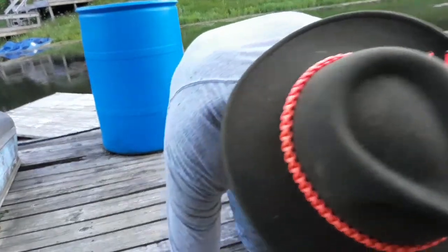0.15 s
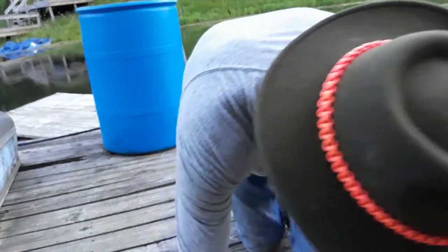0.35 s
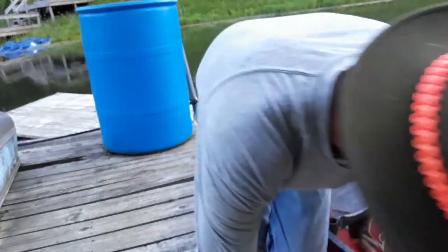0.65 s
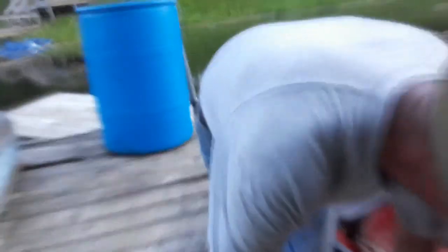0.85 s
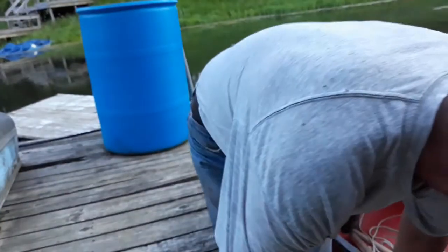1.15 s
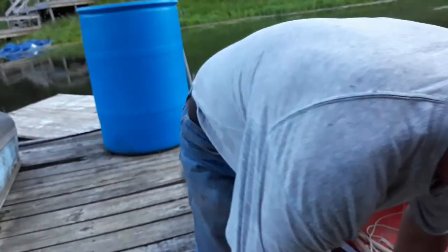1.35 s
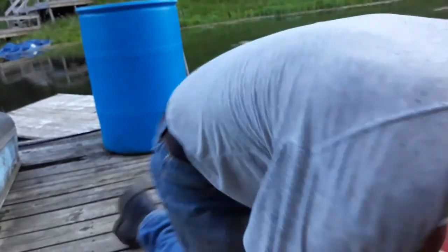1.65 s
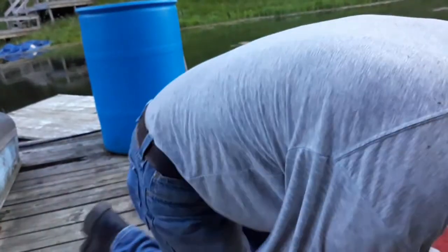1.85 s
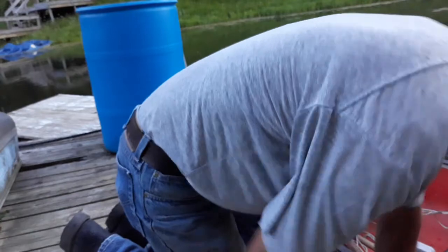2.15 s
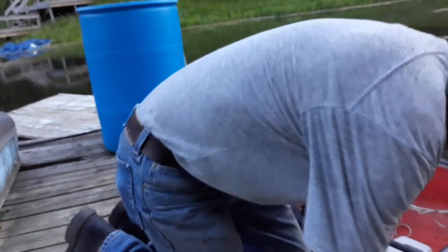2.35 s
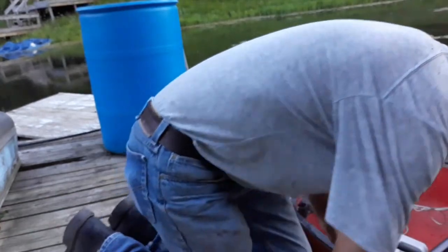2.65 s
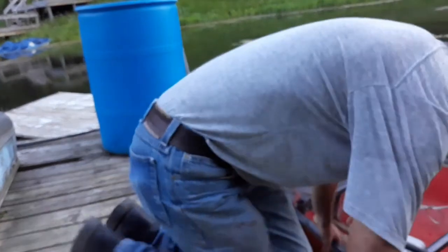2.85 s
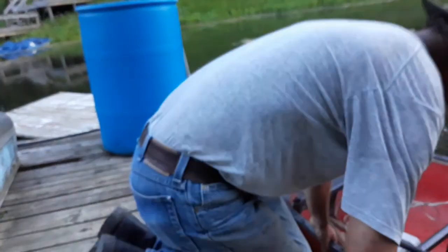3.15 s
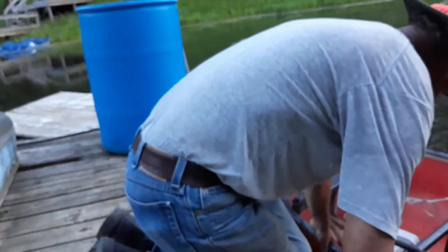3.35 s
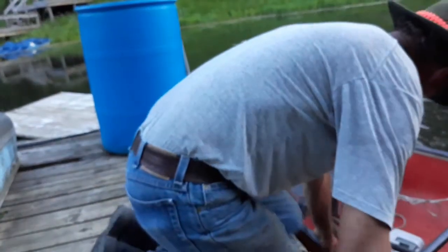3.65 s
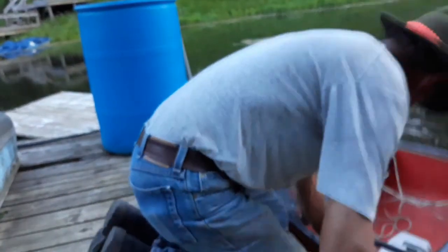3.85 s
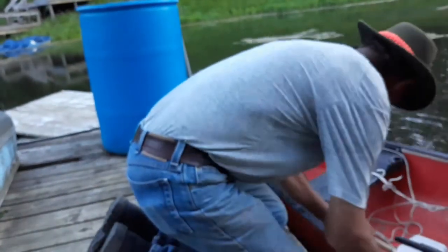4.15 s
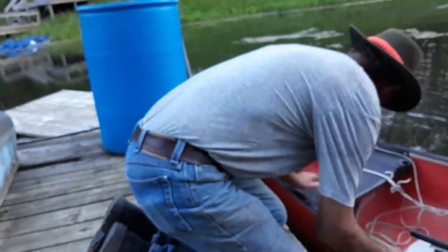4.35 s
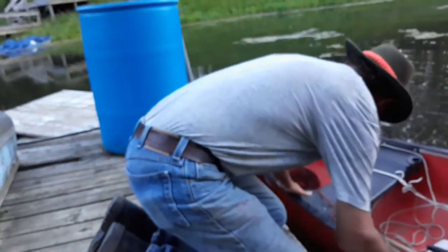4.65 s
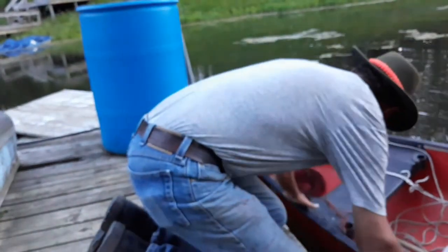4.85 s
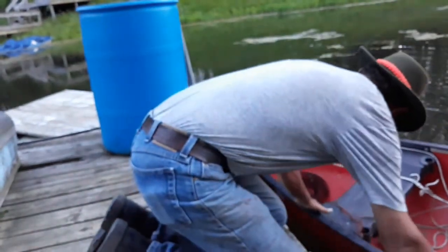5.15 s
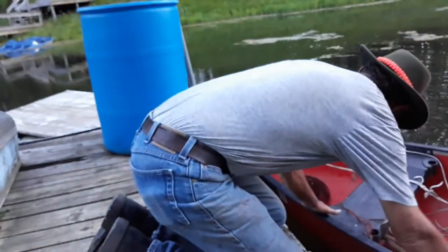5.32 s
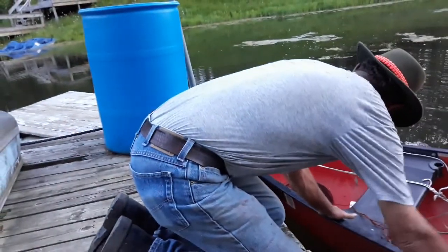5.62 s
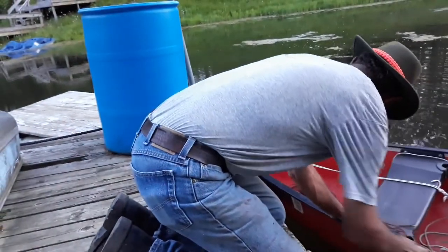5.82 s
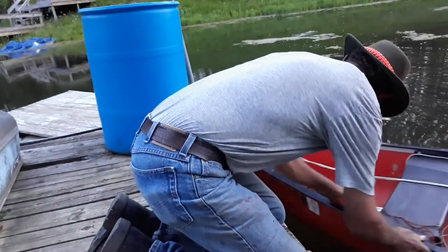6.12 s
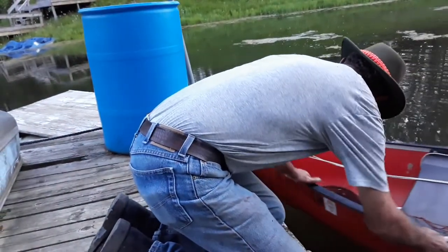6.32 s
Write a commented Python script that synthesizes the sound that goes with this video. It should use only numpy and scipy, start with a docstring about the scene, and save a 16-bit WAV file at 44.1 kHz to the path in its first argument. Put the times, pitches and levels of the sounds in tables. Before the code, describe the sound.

Frogs call beside a lake in high, insect-like clicking trills, a few close to the microphone and slightly right, many more along the shore. Nearby, a canoe is handled at a wooden dock, giving clusters of hollow knocks, low rubs and brief rustles of gear. The handling dies away after about four and a half seconds, and the chorus carries on, a little softer, over faint open-air noise.

```python
"""Lakeside frog chorus and a canoe

Insect-like clicking calls, most likely cricket frogs, come from a few animals close by and many along
the shore. Each call is a pulse train that excites a vocal sac resonant near 3.5 kHz; lower chirps cross
from the far bank. A canoe is handled at a plank dock: impacts ring the modes of hull and wood, stick-slip
friction rubs and groans, and gear rustles. Faint open-air noise and a distant hum lie underneath."""
import sys
import numpy as np
from scipy import signal
from scipy.fft import rfft, irfft
from scipy.io import wavfile
from scipy.ndimage import uniform_filter1d

SR = 44100
rng = np.random.default_rng(int(sys.argv[2]) if len(sys.argv) > 2 else 0)


def generate_wav(signal):
    """Clip the signal to [-1, 1] and save it as 16-bit WAV at the path in sys.argv[1]."""
    frames = np.transpose(np.atleast_2d(signal))
    scaled = np.clip(frames, -1, 1) * 32767
    pcm = np.round(scaled).astype(np.int16)
    wavfile.write(sys.argv[1], SR, pcm)


N = 285768

BINS = np.fft.rfftfreq(4096, 1 / SR)
PORT_DELAY_S = .000475  # lag at the left microphone port for the close frogs
# Spectral envelope of a close pulse, apart from the sac resonance: f/Hz, level/dB
PULSE_SPECTRUM = [(900, -39.5), (1700, -24.5), (2550, -24.5), (2900, -5.5), (3120, -9.5), (3620, 2),
                  (4120, -4.5), (4400, -12.5), (4690, -14.5), (5350, -5.5), (5850, -11), (6350, -18),
                  (6950, -8), (7600, -10.5), (8800, -37), (13300, -21), (16000, -45.5)]
# Close frogs by name: sac f/Hz, bandwidth/Hz, overtones/dB, rasp/dB, extra echo/dB, left-right/dB
FROGS = {"lead": (3507, 376, -1, -4.5, 7.5, -3.5), "second": (3407.5, 380.5, 2, 0, 2.5, -3.5),
         "bright": (3728, 422, 7, 16, 10.5, -10), "husky": (3606, 329, -7.5, 12, 10, -4),
         "faint": (3543, 299, -2, 3.5, 3, -2.5), "low": (3220, 148, -4.5, 1, -4, 1)}


def sac_pulse(spectrum, hz, overtones_db, rasp_db, width_hz, reference_hz=3626):
    """Resonance: a click rings the vocal sac; a smaller animal shifts the nearby spectrum upward."""
    sac_db = -10 * np.log10(1 + (2 * (BINS - hz) / width_hz) ** 2)
    above = np.interp(BINS, [3600, 4800, 7500, 9000], [0, 1, 1, 0])
    below = np.interp(BINS, [900, 1500, 2600, 3100, 3500], [0, .75, 1.25, .35, 0])
    shift_hz = (hz - reference_hz) * np.exp(-abs(BINS - hz) / 2500)
    envelope_db = lookup(spectrum, np.maximum(BINS - shift_hz, 0))
    ring = minimum_phase(envelope_db + sac_db + overtones_db * above + rasp_db * below)[:700]
    return ring / abs(ring).max()


def trill(frog, pulses, first_gap, last_gap, fade_db, glide=.01):
    """Pulse-train excitation: spacing and level drift, pitch rises a little, and each pulse varies."""
    hz, width_hz, overtones_db, rasp_db, *_ = FROGS[frog]
    out = np.zeros(4096)
    gaps = first_gap + (last_gap - first_gap) * np.linspace(0, 1, pulses - 1) ** 1.5
    starts = np.r_[0, np.cumsum(gaps)]
    for k, (loud_db, detune, tilt_db) in enumerate(rng.standard_normal((pulses, 3)) * [.5, .008, 1.2]):
        pitch = hz * (1 + glide * (k - (pulses - 1) / 2) + detune)
        ring = sac_pulse(PULSE_SPECTRUM, pitch, overtones_db + tilt_db, rasp_db - tilt_db, width_hz)
        add(out, starts[k], gain(loud_db - fade_db * (k / (pulses - 1)) ** 1.35) * ring)
    return out


def near_calls(turn_db_per_s=.22):
    """Impulse excitation, in trains or singly: yields t/s, level/dB, echo/dB, left-right/dB, sound."""
    # Trills: t/s, level/dB, pulses, first gap/s, last gap/s, fade/dB, frog
    trills = [(0.1018, -12.5, 5, .006, 0.0076, 3, "second"), (0.2103, -5.5, 4, 0.0042, 0.0034, 5, "lead"),
              (0.3589, -12.5, 5, 0.0069, 0.0038, 0.5, "second"),
              (0.4576, -5.5, 5, .0054, 0.0033, 5.5, "lead"), (.586, -16.5, 6, .006, 0.0064, -1.5, "second"),
              (0.7085, -7, 4, .0053, .0047, 3.5, "lead"), (0.8193, -15.5, 5, 0.0051, 0.0061, 8, "second"),
              (0.9403, -5.5, 5, 0.0048, 0.0039, 9.5, "lead"),
              (1.0439, -12.5, 6, 0.0066, .0055, 6, "second"), (1.1594, -3.5, 5, 0.0046, 0.0046, 9, "lead"),
              (1.292, -15, 6, 0.0053, 0.0047, 0, "second"), (1.4041, -7, 5, .0055, 0.0024, 6, "lead"),
              (1.525, -30, 4, 0.0055, 0.0032, -8.5, "second"), (1.5507, -3.5, 4, 0.006, 0.0041, 13, "lead"),
              (1.676, -6.5, 4, .0057, 0.0037, 12.5, "lead"), (1.7987, -5.5, 3, .0058, 0.0059, 6.5, "lead"),
              (1.9229, -7, 4, 0.0067, 0.0043, 7, "lead"), (2.0509, -6, 5, 0.0066, .0046, 9, "lead"),
              (2.1864, -7, 4, .0061, 0.0044, 4.5, "lead"), (2.3365, -5, 4, .0061, 0.0067, 8, "lead"),
              (2.4991, -8, 3, .0057, 0.0035, 3, "lead"), (2.615, -13.5, 6, 0.0068, 0.0049, 1, "second"),
              (2.6944, -6.5, 5, .0056, 0.0047, 8.5, "lead"), (2.8741, -7, 5, .0057, 0.0042, 11, "lead"),
              (3.0138, -9.5, 4, 0.0053, 0.0036, 3.5, "lead"), (3.1433, -11, 4, .006, 0.0046, 4.5, "lead"),
              (3.2006, -22, 6, .006, 0.0046, 2, "second"), (3.3456, -7, 4, 0.0057, 0.0063, 7, "lead"),
              (3.478, -19.5, 6, 0.0055, .0058, -0.5, "low"), (3.6424, -10, 5, .0062, 0.0062, 6, "lead"),
              (3.762, -29, 6, 0.0047, .005, 10, "low"), (4.075, -32, 7, 0.0066, 0.0052, 2, "low"),
              (5.085, -20, 4, .0058, 0.0066, 4, "low"), (5.295, -25, 4, 0.0089, .0055, 9, "low"),
              (3.9033, -9.5, 5, 0.0062, .0053, 4.5, "lead"), (4.1338, -12, 5, .0064, .0043, 5, "lead"),
              (4.2942, -14.5, 5, .0059, 0.0043, 5, "lead"), (4.385, -27, 7, .006, 0.0072, 1.5, "faint"),
              (4.4328, -17.5, 3, 0.0071, 0.007, 1, "faint"), (4.5198, -8, 5, .0062, 0.0073, 10.5, "lead"),
              (4.735, -28, 5, .006, 0.0066, 1, "faint"), (4.85, -20, 4, .006, 0.007, 13, "faint"),
              (4.9215, -13.5, 4, .0053, 0.0035, 13, "husky"),
              (5.0575, -14, 4, 0.0069, 0.0056, 8.5, "bright"), (5.121, -29, 3, 0.0041, 0.012, 1.5, "faint"),
              (5.461, -17.5, 7, 0.0043, .0055, 2.5, "faint"), (5.6109, -13, 4, 0.0064, 0.0045, 8, "bright"),
              (5.6548, -13.5, 3, 0.0048, 0.0037, 12, "husky"), (5.747, -21, 9, .006, .0055, 3.5, "faint"),
              (5.832, -15.5, 4, 0.0056, 0.0062, 5, "bright"),
              (5.904, -21.5, 7, .006, 0.0062, -0.5, "faint"),
              (6.039, -13.5, 4, .0053, 0.0052, 9.5, "husky"),
              (6.1351, -14, 4, 0.0052, 0.006, 3.5, "bright"), (6.218, -22, 9, .006, 0.0034, 22, "faint"),
              (6.3383, -14, 4, .006, 0.0059, 5, "bright"), (6.4472, -13.5, 3, 0.0063, 0.0046, 1.5, "husky")]
    # Clicks with which the second frog winds up to a trill: time ahead/s, relative level/dB
    wind_up = [(0.045, 0.5), (0.015, -9), (0.017, -1)]
    # Its lone clicks: t/s, level/dB
    lone_clicks = [(.058, -19.5), (.2766, -11.5), (0.3057, -11), (1.1015, -17), (1.1385, -16.5),
                   (2.3235, -12), (2.4672, -9), (3.2898, -11.5), (3.3074, -10.5), (3.5597, -13),
                   (3.589, -9), (3.601, -10.5), (3.8732, -13.5), (4.448, -6.5), (4.4713, -10.5),
                   (4.492, -12)]
    clicks = list(lone_clicks)
    for s, db, pulses, first_gap, last_gap, fade_db, frog in trills:
        *_, wet_db, pan_db = FROGS[frog]
        if frog == "lead":  # it turns and sounds more central
            pan_db += turn_db_per_s * s
        if frog == "second":
            clicks += [(s - ahead, db + relative_db) for ahead, relative_db in wind_up]
        yield s, db, wet_db, pan_db, trill(frog, pulses, first_gap, last_gap, fade_db)
    hz, width_hz, overtones_db, rasp_db, wet_db, pan_db = FROGS["second"]
    for s, db in clicks:
        yield s, db, wet_db, pan_db, sac_pulse(PULSE_SPECTRUM, hz, overtones_db - 2, rasp_db, width_hz)


def near_frogs(level_db=.12, echo_db=-24):
    """Direct-to-reverberant ratio: the farther and fainter a frog on the right, the more of it is echo."""
    direct, scattered = np.zeros((2, 2, N))
    for s, db, wet_db, pan_db, voice in near_calls():
        sound = gain(level_db) * ports(voice, pan_db, PORT_DELAY_S)
        add(direct, s, gain(db) * sound)
        add(scattered, s, gain(echo_db + wet_db) * sound)
    return direct + shore_echo(scattered, t60=.031)


def far_frogs(count=13, calls_per_s=3.9, pitch_hz=3550, width_hz=240, level_db=2.01, echo_db=-7):
    """Incoherent sum of many frogs along the shore, each with its own pitch, rasp, pace and direction."""
    # Pulse spectrum after crossing the water: f/Hz, level/dB
    far_spectrum = [(1000, -32), (1700, -11.5), (2300, -12), (2800, -2.5), (3200, 2.5), (3700, -1),
                    (4400, -12), (5200, -4), (6300, -15), (7200, -4.5), (8800, -27), (13500, -32.5),
                    (16000, -30)]
    # Envelope of the chorus: t/s, level/dB
    chorus_level = [(0, -28.5), (.46, -32.5), (.8, -29), (1.18, -32), (1.82, -29), (2, -31.5), (2.3, -29.5),
                    (2.76, -33.5), (2.9, -29), (3.04, -34), (3.7, -33), (4.29, -32.5), (4.42, -29.5),
                    (4.58, -33), (4.75, -30), (5.27, -30), (5.37, -31.5), (6.48, -30)]
    out, places = np.zeros((2, N)), (np.arange(count) + .5) / count
    for place, build, turn in zip(places, rng.permutation(places), rng.permutation(places)):
        hz = pitch_hz * (1 + .029 * np.arctanh(2 * build - 1))
        pace, gap_s, rasp_db = rng.uniform([.78 * calls_per_s, .0044, -8], [1.2 * calls_per_s, .0072, 1])
        ring, clicks = sac_pulse(far_spectrum, hz, 0, rasp_db, width_hz), np.zeros(N)
        for beat, (late, loud, length, hurry) in enumerate(rng.uniform(-1, 1, (48, 4))):
            k = np.arange(round(9 + 5 * length))
            onset = (beat - 1 + turn + .3 * late) / pace
            # even pulses that slowly speed up or lag give the call a short gliding tone
            s = onset + gap_s * k * (1 + .003 * hurry * k) + .00004 * rng.standard_normal(len(k))
            arch = np.sin(np.pi * (k + 1) / (len(k) + 1)) ** .5
            strength = gain(6.5 * loud + 2.2 * rng.standard_normal(len(k))) * arch
            heard = (s >= 0) & (s < (N - 1) / SR)
            clicks[(s[heard] * SR).astype(int)] += strength[heard]
        delay_s = PORT_DELAY_S * (1 - 1.547 * place ** 2.586)
        out += wandering_ring(clicks, ports(ring, .5, delay_s))
    out += gain(echo_db) * shore_echo(out)
    # the animals fill each other's gaps, so the sum is levelled before it takes its envelope
    running_rms = np.sqrt(uniform_filter1d((out ** 2).mean(0), size=3400) + 1e-12)
    return gain(level_db) * envelope(chorus_level) * out / running_rms


def wandering_ring(clicks, ring, wander_hz=70, steps_per_s=22):
    """Single-sideband shift: the pitch rung by the clicks drifts within and between calls."""
    steps = np.arange(N) / SR * steps_per_s
    phase = phase_of(wander_hz * np.interp(steps, np.arange(512), rng.standard_normal(512)))
    quadrature = convolve(clicks, signal.hilbert(ring).imag)
    return convolve(clicks, ring) * np.cos(phase) - quadrature * np.sin(phase)


def shore_echo(x, t60=.99):
    """Scattering off water, planks and trees: sparse reflections that decay exponentially."""
    t = np.arange(SR // 2) / SR
    tail = rng.standard_normal((2, len(t))) * decay(t, t60) * (t > .0025)
    tail *= rng.random((2, len(t))) < .05
    return convolve(x, tail / np.linalg.norm(tail[0]))


def chirps(level_db=-8, width_hz=130, glide=-.08, rasp=.65, throb=.49, throb_hz=185, size=1200):
    """Amplitude modulation: throbbing, raspy notes that fall in pitch, from the far bank on the left."""
    # Chirps: t/s, level/dB, centre f/Hz
    notes = [(3.376, -24.5, 2740), (3.522, -27, 2750), (4.215, -28, 2610), (5.652, -30, 2610),
             (6.04, -28.5, 2700), (6.45, -28, 2690)]
    out, u = np.zeros((2, N)), np.arange(size) / size
    beats = 1 - throb * np.cos(2 * np.pi * throb_hz * np.arange(size) / SR)
    for s, db, hz in notes:
        a, b = unit_rms(lowpass(rng.standard_normal((2, size)), width_hz, order=2))
        phase = phase_of(hz * (1 + glide * (u - .5)))
        tone = unit_rms((1 + rasp * a) * np.sin(phase) + rasp * b * np.cos(phase))
        note = tone * beats * np.sin(np.pi * u)
        add(out, s, gain(db + level_db) * ports(note, .66, -PORT_DELAY_S / 4))
    return out


def hull_response(ring_db=-8, thud_db=-2, tail_db=-8, thud_t60=.075, size=32768):
    """Modal impulse response of hull and dock: a thud, modes that shift with load, and a hollow tail."""
    # Distinct modes: f/Hz, level/dB, T60/s
    hull_modes = [(99, -1, 0.32), (133.4, -6.5, 0.47), (189.3, -2.5, 0.33), (221.1, 0, 0.37),
                  (283, -2, 0.19), (314, -2.5, 0.14), (393, -7, 0.32), (480.6, -10, 0.076), (554, -14, .11),
                  (669, -10.5, 0.14), (800, -13, .14), (890, -14, .15), (1038, -5.5, .15), (1090, -16, .12),
                  (1130, -12.5, 0.16)]
    # Spectrum of the dense plank modes: f/Hz, level/dB
    plank_spectrum = [(25, -49.5), (55, -7), (100, 4), (200, -2), (300, -2.5), (600, -4), (900, -5),
                      (1400, -4), (3000, -1.5), (8000, -51)]
    # Their decay: f/Hz, T60/s
    plank_t60 = [(80, 0.83), (210, 0.51), (560, 0.31), (1470, 0.037), (8000, 0.064)]
    # Difference between the two ports: f/Hz, side against mid/dB
    stereo_width = [(100, -18.5), (250, -7.5), (500, -7), (1000, -.5)]
    t = np.arange(size) / SR
    load = 1 + .025 * rng.uniform(-1, 1, len(hull_modes))
    modes = sum((-1) ** k * gain(db) * decay(t, t60) * np.sin(2 * np.pi * hz * load[k] * t)
                for k, (hz, db, t60) in enumerate(hull_modes))
    mid, side = coloured(rng.standard_normal((2, size)), plank_spectrum)
    side = coloured(side, stereo_width)
    dense = np.array([mid + side, mid - side])
    band_hz, frame_s, bands = signal.stft(dense[:, ::-1], SR, nperseg=1024)
    bands *= decay(frame_s, lookup(plank_t60, band_hz)[:, None])
    tail = signal.istft(bands, SR, nperseg=1024)[1][:, :size]
    thud = dense * decay(t, thud_t60)
    whole = sum(gain(db) * unit_rms(x) for db, x in [(ring_db, modes), (thud_db, thud), (tail_db, tail)])
    return whole * (1 - np.exp(-t / .00087))


def knocks(spot_db=3, overtone_db=-9, overtone_ratio=2.15, sag=.21, sag_s=.01):
    """Impact of hull on dock: the struck spot swings as a damped oscillator; soft contact cuts treble."""
    # Impacts: t/s, level/dB, spot f/Hz, contact cut-off/Hz, spot T60/s
    impacts = [(0.136, -34, 209, 440, 0.057), (.188, -41, 136, 300, 0.064), (0.636, -50.5, 110, 170, 0.14),
               (.689, -54, 106, 170, .1), (.738, -45, 120, 625, .08), (.775, -46, 116, 400, 0.074),
               (0.838, -32.5, 292, 1180, 0.066), (.848, -28, 139, 600, 0.026),
               (.863, -39.5, 415, 1200, 0.065), (0.889, -31, 135, 219, 0.18), (.946, -27, 123, 475, .045),
               (1.004, -35.5, 106, 290, 0.069), (1.678, -34, 199, 680, 0.054),
               (1.738, -37.5, 95.5, 1100, .06), (1.766, -41, 158, 606, 0.063),
               (1.799, -31.5, 510, 800, 0.033), (1.805, -32, 211, 850, .06),
               (1.819, -29.5, 280, 603, 0.031), (1.842, -33, 235, 644, 0.045),
               (1.872, -34.5, 185, 400, 0.043), (1.929, -43, 205, 260, 0.11),
               (2.021, -35.5, 162, 335, 0.073), (2.108, -23.5, 186, 695, 0.03),
               (2.123, -27, 378, 495, 0.057), (2.18, -42, 410, 457, 0.16), (2.212, -36.5, 166, 310, 0.046),
               (2.354, -48.5, 147, 296, 0.084), (2.822, -54, 115, 220, .08), (2.862, -30.5, 207, 454, .04),
               (2.913, -28.5, 207, 625, 0.031), (3.443, -47.5, 270, 710, 0.035),
               (3.807, -47.5, 443, 1020, 0.03), (3.82, -41.5, 264, 490, 0.037),
               (4.452, -44.5, 506, 850, 0.088), (4.464, -41, 309, 750, 0.093), (4.488, -49, 230, 700, .06),
               (4.587, -62, 800, 1200, 0.033)]
    out, onset = np.zeros((2, N)), 900  # the first samples set a knock's level
    for s, db, spot_hz, bright_hz, spot_t60 in impacts:
        # a stiff, high-pitched spot stirs little of the deep hull ring
        body = butterworth(lowpass(hull_response(), bright_hz), spot_hz / 2.18, "high", order=2)
        t = np.arange(body.shape[1]) / SR
        # the spot starts stiff and relaxes, so its pitch sags; a hard blow adds an overtone
        phase = phase_of(spot_hz * (1 + sag * (np.exp(-t / sag_s) - .5)))
        overtone_gain = gain(overtone_db) / (1 + (overtone_ratio * spot_hz / bright_hz) ** 2)
        swing = np.sin(phase) + overtone_gain * np.sin(overtone_ratio * phase)
        spot = butterworth(swing * decay(t, spot_t60) * (1 - np.exp(-t / .00091)), spot_hz / 2, "high")
        spot = ports(spot, .5, -PORT_DELAY_S / 3)[:, :len(t)] / spot[:onset].std()
        blow = body / body[:, :onset].std() + gain(spot_db) * spot
        add(out, s, gain(db) * blow / blow[:, :onset].std())
    return out


def rubs(level_db=1, uneven_db=4.5, slips_per_s=1000):
    """Stick-slip friction: fine random slips drive the hull; each slide swells fast and trails off."""
    # Slides along the planks: t/s, duration/s, level/dB, cut-off/Hz
    slides = [(.129, 0.042, -54, 1100), (.579, 0.17, -63, 800), (.723, 0.33, -55, 500),
              (.841, 0.053, -39.5, 1500), (.961, 0.33, -51.5, 420), (1.023, 0.15, -56, 1200),
              (1.67, 0.28, -46.5, 900), (1.93, .42, -51.5, 420), (2.32, 0.17, -54.5, 700),
              (2.459, .24, -59.5, 281), (2.782, 0.32, -52.5, 750), (3.039, .2, -50.5, 850),
              (3.426, 0.14, -50, 850), (3.62, .13, -56, 650), (3.843, 0.14, -58.5, 800),
              (3.972, .17, -57.5, 950), (4.48, 0.27, -61, 750)]
    out = np.zeros((2, N))
    for s, length, db, hz in slides:
        u = np.arange(0, 1, 1 / (length * SR))
        slips = (rng.standard_normal(SR) * (rng.random(SR) < slips_per_s / SR))[:len(u)]
        pressure = gain(uneven_db * slow_noise(51))[-len(u):]
        force = slips * pressure * np.sin(np.pi * u ** .35)
        rub = lowpass(convolve(force, hull_response(ring_db=-14, tail_db=-11)), hz, order=3)
        # a light, bright slide stirs little of the deep ring
        rub = butterworth(rub, [hz * .14, hz * 1.1], "band")
        add(out, s, gain(db + level_db) * rub / rub[:, :len(u)].std())
    return out


def groans(rough=.72, width_hz=42):
    """Periodic stick-slip: the dragging hull judders at a low pitch that sinks as the load eases."""
    # Drags: t/s, duration/s, level/dB, first f/Hz, last f/Hz
    drags = [(0.963, .15, -43.5, 242, 193), (1.12, .17, -57.5, 168, 138),
             (2.453, 0.23, -54.5, 233.6, 185.5), (2.93, 0.0864, -46, 205, 120)]
    out = np.zeros((2, N))
    for s, length, db, first_hz, last_hz in drags:
        u = np.arange(0, 1, 1 / (length * SR))
        grip, drift = (slow_noise(width_hz)[-len(u):] for _ in range(2))
        phase = phase_of(first_hz + (last_hz - first_hz) * u)
        judder = (1 + rough * grip) * np.sin(phase) + rough * drift * np.cos(phase)
        add(out, s, gain(db) * unit_rms(judder * np.sin(np.pi * u ** .54)))
    return out


def scrapes(spiky=1.6, uneven_db=2):
    """Friction noise: soft, grainy scuffs on the planks swell and trail off."""
    # Scuffs: t/s, duration/s, level/dB
    scuffs = [(1.015, .14, -53.5), (1.733, 0.14, -56), (1.951, 0.17, -57.5), (2.842, 0.12, -55),
              (3.026, 0.14, -58), (3.438, 0.12, -53), (3.785, 0.052, -52)]
    # Their spectrum: f/Hz, level/dB
    spectrum = [(100, -20), (500, -13), (1200, -3.5), (2200, 5), (4000, -12.5), (9000, -12.5), (16000, -23)]
    out = np.zeros((2, N))
    for s, length, db in scuffs:
        u = np.arange(0, 1, 1 / (length * SR))
        grains = coloured(spiky_noise(SR, spiky), spectrum) * gain(uneven_db * slow_noise(50))
        add(out, s, gain(db) * unit_rms(grains[:, -len(u):] * np.sin(np.pi * u)))
    return out


def rustles(snappy=1.5, spiky=1.4, pan_db=-1.5):
    """Crackling noise: rope and cloth give brief clumps of tiny snaps, a little to the right."""
    # Clumps of snaps: t/s, duration/s, level/dB
    clumps = [(0.843, .02, -37), (0.86, 0.019, -38.5), (0.876, 0.0073, -32.5), (0.887, 0.039, -47.5),
              (0.947, 0.029, -48), (1.72, 0.0056, -46), (1.8, 0.056, -49.5), (3.7805, 0.023, -32.5),
              (3.795, .04, -53.5)]
    # Their spectrum: f/Hz, level/dB
    spectrum = [(1000, -7.5), (4000, 2.5), (7300, 4), (9500, -9), (12000, -3), (16000, -7.5)]
    out, t = np.zeros((2, N)), np.arange(2049) / SR
    for s, length, db in clumps:
        snaps = unit_rms(coloured(spiky_noise(len(t), spiky), spectrum))
        rise = 4 * t / length
        add(out, s, gain(db) * snaps * (rise * np.exp(1 - rise)) ** snappy)
    return out * gain([[pan_db / 2], [-pan_db / 2]])


def air(width=.46, flicker_db=.8):
    """Broadband noise: faint, nearly steady open-air rumble and hiss, a little louder at the end."""
    # Spectrum of the open air: f/Hz, level/dB
    spectrum = [(20, -16), (60, -2), (130, -4), (250, -13.5), (750, -15.5), (1000, -24.5), (1500, -18.5),
                (4000, -9), (9000, -24.5), (14000, -30.5), (16000, -35)]
    # Gain applied to the noise, within a few decibels of steady: t/s, level/dB
    gain_curve = [(0, -60), (3.9, -59.5), (5.4, -62), (5.9, -60), (6.48, -57)]
    mid, side = coloured(rng.standard_normal((2, N)), spectrum)
    flicker = gain(flicker_db * slow_noise(7, size=N, order=2))
    return envelope(gain_curve) * flicker * unit_rms(np.array([mid + width * side, mid - width * side]))


def hum(hz=372, width_hz=14, level_db=-81, start_s=4.2, rise_s=.7):
    """Narrow-band noise: a faint, wavering hum comes up in the distance."""
    t = np.arange(N) / SR
    waver = lowpass(rng.standard_normal(N) + 1j * rng.standard_normal(N), width_hz, order=2)
    fade_in = np.clip((t - start_s) / rise_s, 0, 1)
    return gain(level_db) * fade_in * unit_rms((waver * np.exp(2j * np.pi * hz * t)).real)


def ports(x, pan_db, delay_s, pad=32):
    """Level and time differences at two microphone ports: sound from the right reaches the left later."""
    x = np.pad(x, pad)
    lag = np.exp(-2j * np.pi * np.fft.rfftfreq(len(x), 1 / SR) * delay_s)
    pair = np.array([gain(pan_db) * irfft(rfft(x) * lag, len(x)), x])
    return pair[:, pad if delay_s > 0 else 0:] / np.sqrt((1 + gain(2 * pan_db)) / 2)


def shadowed(pair):
    """Acoustic shadow: the housing shields the left port from the treble of frogs on the right."""
    # Shadow of the housing: f/Hz, left-right/dB
    shadow = [(1500, 3.5), (3300, -0.5), (4500, -5), (7500, -0.5), (13000, -8.5)]
    return np.array([coloured(x, [(hz, sign * db / 2) for hz, db in shadow])
                     for x, sign in zip(pair, (1, -1))])


def gain(db):
    """Decibels to amplitude."""
    return 10 ** (np.asarray(db) / 20)


def decay(t, t60):
    """Exponential damping, 60 dB in t60 seconds."""
    return gain(-60 * t / t60)


def phase_of(hz):
    """Phase as the integral of frequency."""
    return 2 * np.pi * np.cumsum(hz) / SR


def unit_rms(x):
    """Normalisation to unit power."""
    return x / np.sqrt(np.mean(x ** 2) + 1e-20)


def lookup(points, hz):
    """Interpolation on a log-frequency axis."""
    f, value = np.transpose(points)
    return np.interp(np.log(hz + 1), np.log(f + 1), value)


def envelope(curve):
    """Interpolation of (t/s, level/dB) points to a gain for every sample."""
    return gain(np.interp(np.arange(N) / SR, *np.transpose(curve)))


def add(mix, s, sound):
    """Superposition of a sound at time s."""
    part = mix[..., max(round(s * SR), 0):][..., :sound.shape[-1]]
    part += sound[..., :part.shape[-1]]


def coloured(x, points):
    """Zero-phase filtering by (f/Hz, level/dB) points."""
    size = x.shape[-1]
    return irfft(rfft(x) * gain(lookup(points, np.fft.rfftfreq(size, 1 / SR))), size)


def minimum_phase(db):
    """The promptest causal impulse response with these gains on BINS."""
    log_gain = np.log(gain(np.r_[db, db[-2:0:-1]]))
    return irfft(np.exp(np.conj(signal.hilbert(log_gain)))[:len(BINS)])


def convolve(x, response):
    """Convolution along time, cut to the length of the scene."""
    return signal.oaconvolve(np.atleast_2d(x), np.atleast_2d(response), axes=1)[:, :N]


def butterworth(x, hz, kind, order=1):
    """Maximally flat filtering."""
    return signal.sosfilt(signal.butter(order, hz, kind, fs=SR, output="sos"), x)


def lowpass(x, hz, order=4):
    """Attenuation above a cut-off."""
    return butterworth(x, hz, "low", order)


def slow_noise(hz, size=SR, order=4):
    """Band-limited random fluctuation of unit power."""
    return unit_rms(lowpass(rng.standard_normal(size), hz, order))


def spiky_noise(size, power):
    """Heavy-tailed stereo noise: a power law lifts the peaks into grains."""
    noise = rng.standard_normal((2, size))
    return np.sign(noise) * abs(noise) ** power


def scene():
    """Superposition of frogs, canoe and background."""
    canoe = knocks() + rubs() + groans() + scrapes() + rustles()
    return shadowed(near_frogs() + far_frogs()) + chirps() + canoe + air() + hum()


def record(dry, low_cut_hz=55, band_limit_hz=15850):
    """Band limiting: the microphone rolls off the bass and the recorder cuts the top treble."""
    thin = butterworth(dry, low_cut_hz, "high", order=2)
    kernel = signal.firwin(511, band_limit_hz, window=("kaiser", 9), fs=SR)
    return signal.oaconvolve(thin, kernel[None], "same")


dry = scene()
out = record(dry)
generate_wav(out)
```